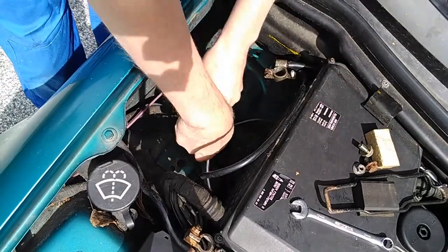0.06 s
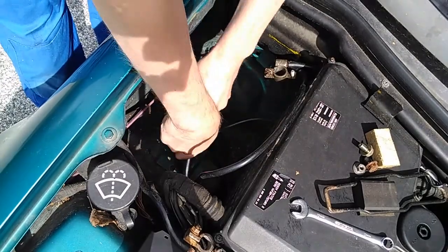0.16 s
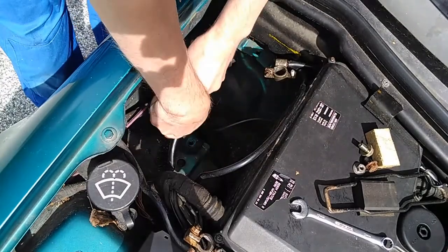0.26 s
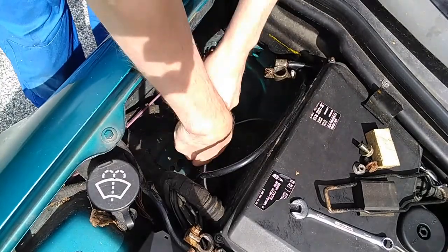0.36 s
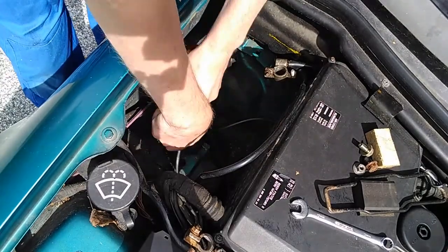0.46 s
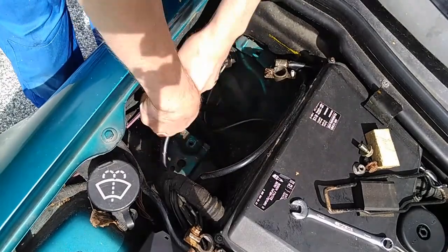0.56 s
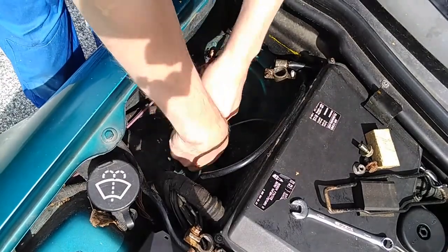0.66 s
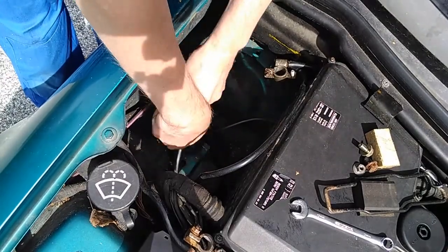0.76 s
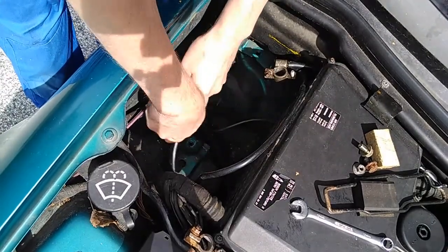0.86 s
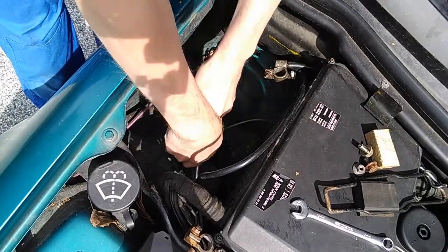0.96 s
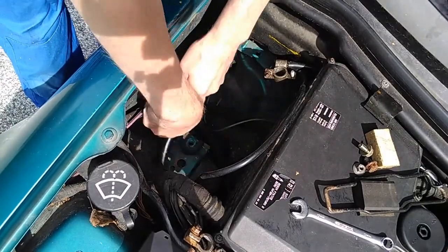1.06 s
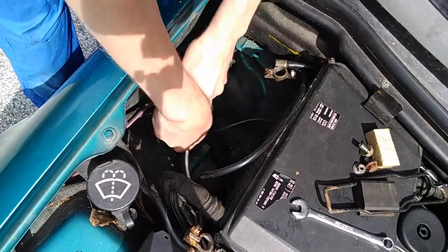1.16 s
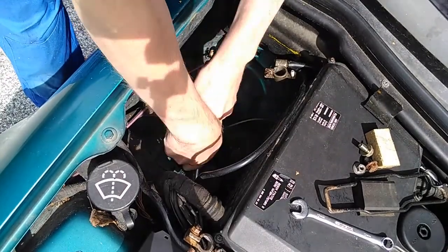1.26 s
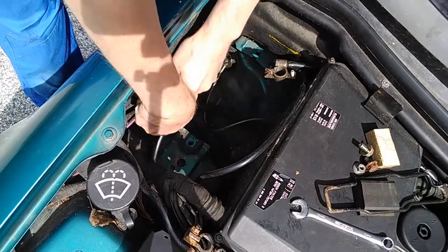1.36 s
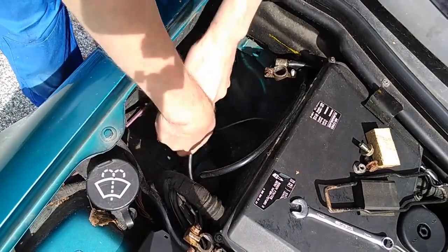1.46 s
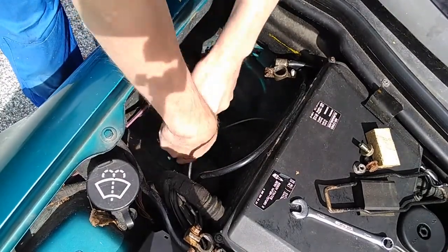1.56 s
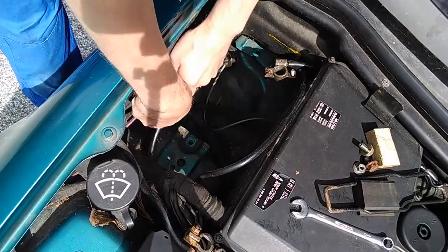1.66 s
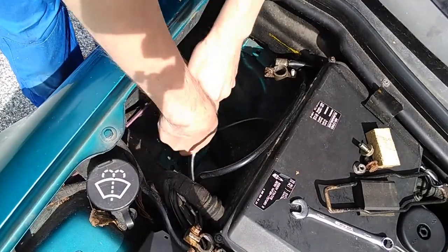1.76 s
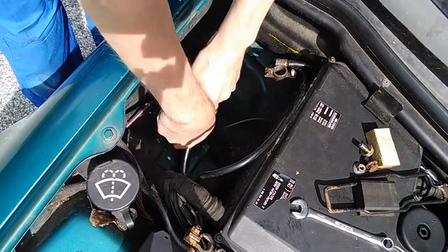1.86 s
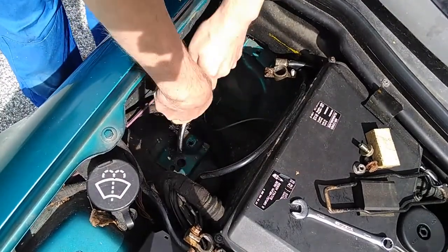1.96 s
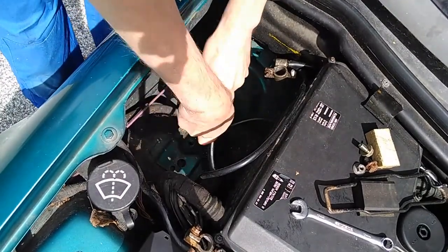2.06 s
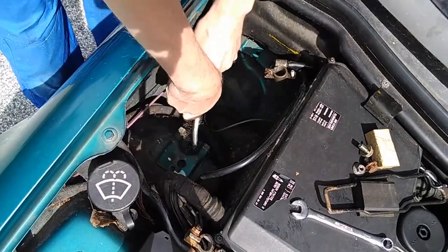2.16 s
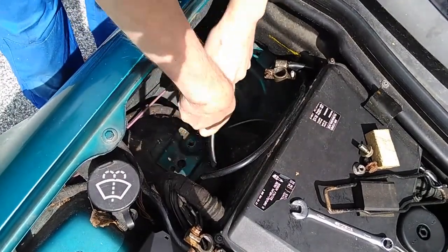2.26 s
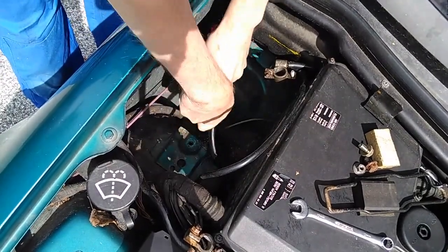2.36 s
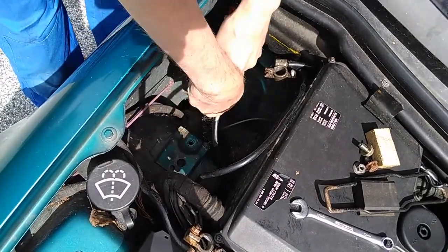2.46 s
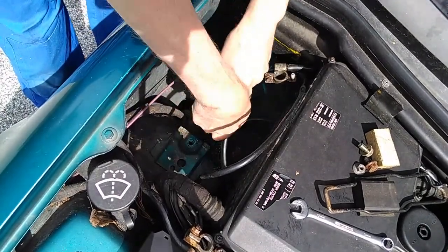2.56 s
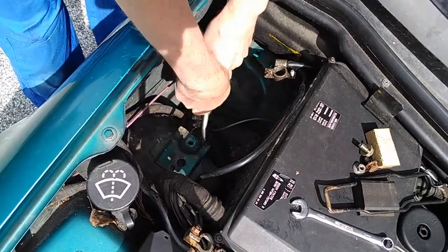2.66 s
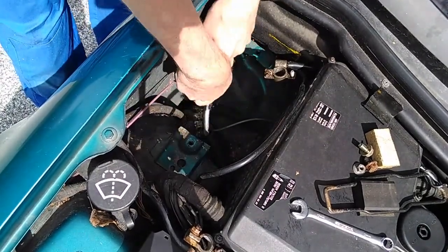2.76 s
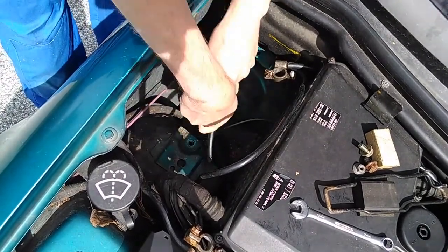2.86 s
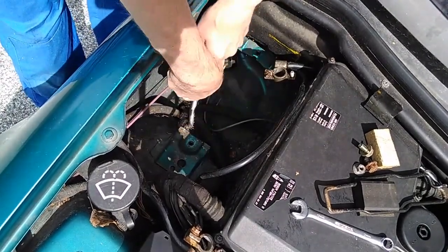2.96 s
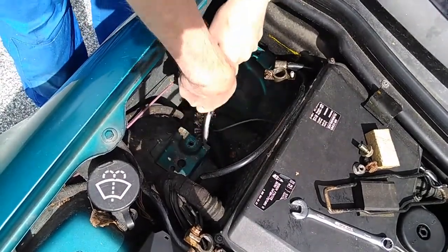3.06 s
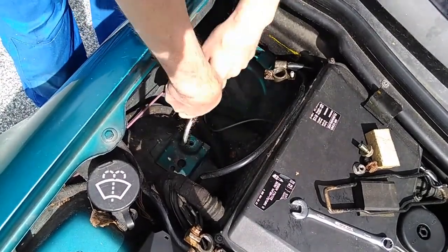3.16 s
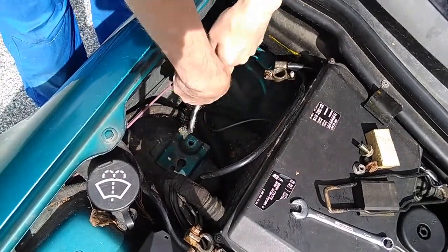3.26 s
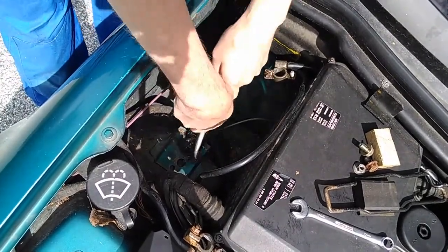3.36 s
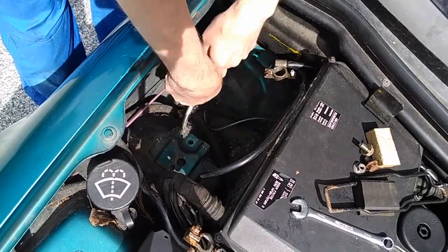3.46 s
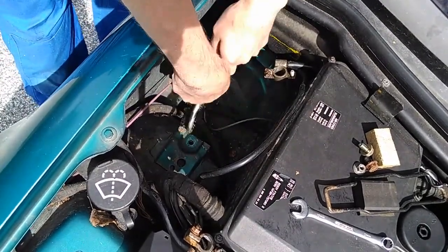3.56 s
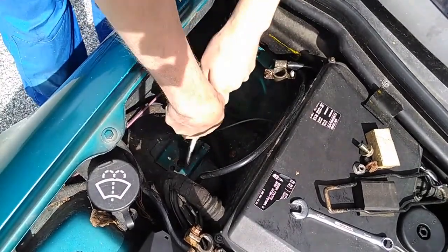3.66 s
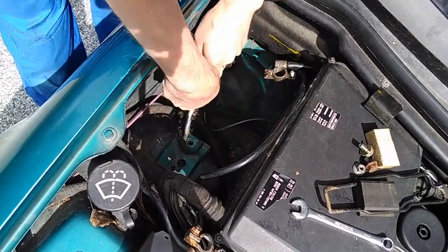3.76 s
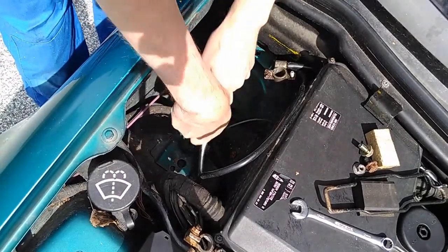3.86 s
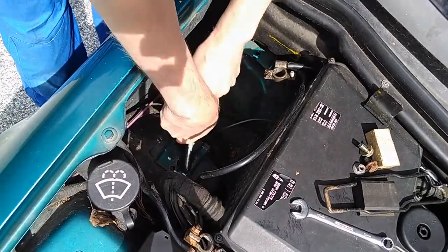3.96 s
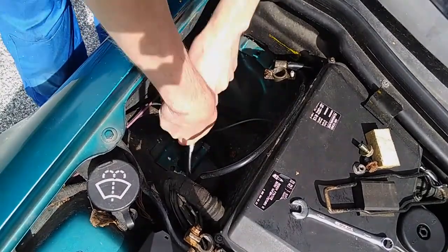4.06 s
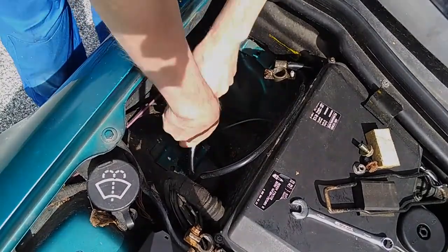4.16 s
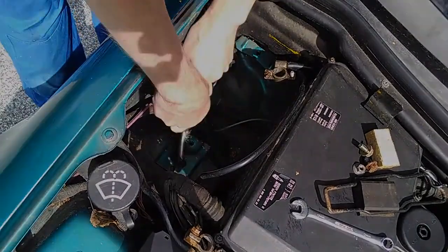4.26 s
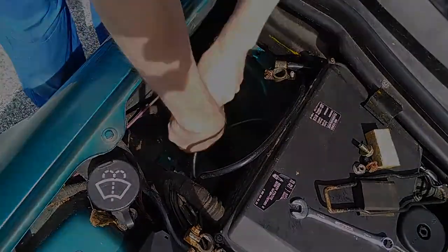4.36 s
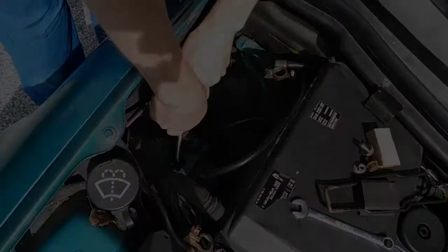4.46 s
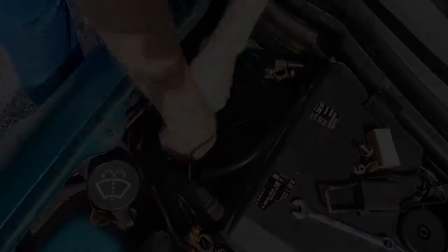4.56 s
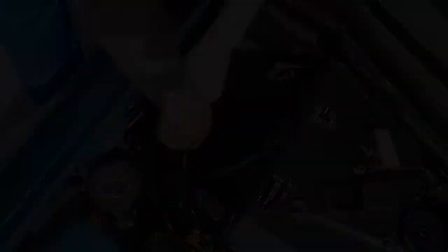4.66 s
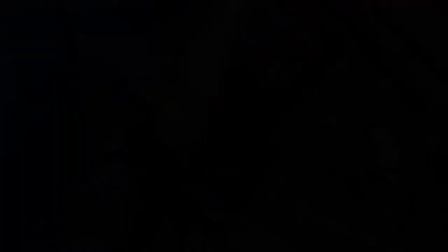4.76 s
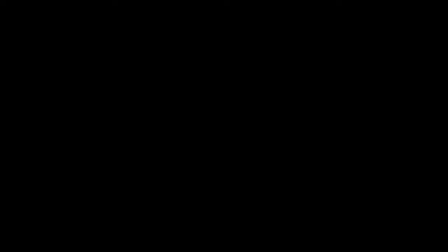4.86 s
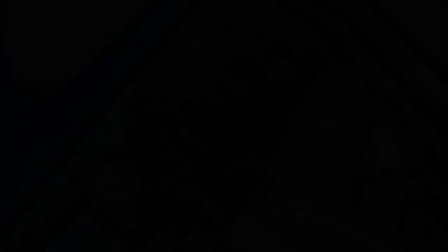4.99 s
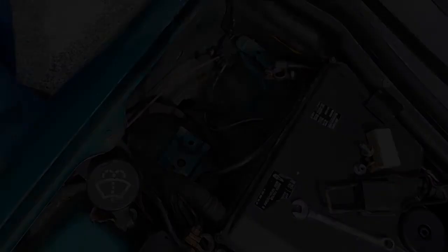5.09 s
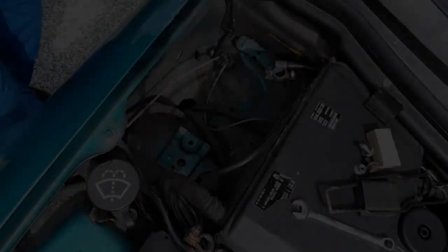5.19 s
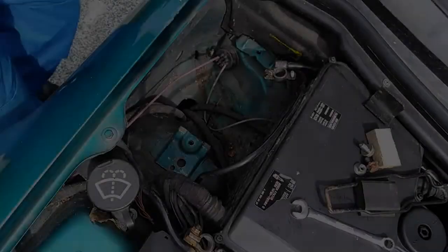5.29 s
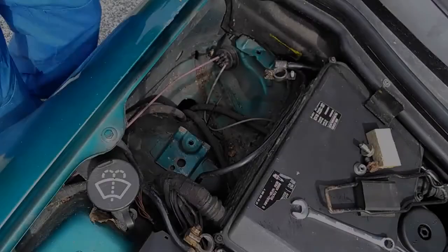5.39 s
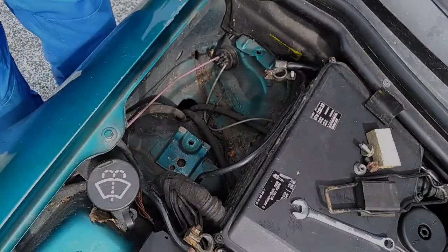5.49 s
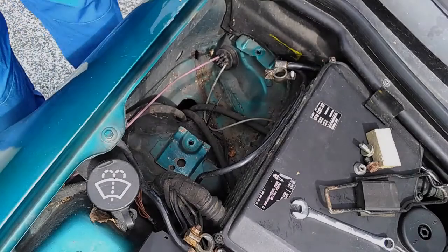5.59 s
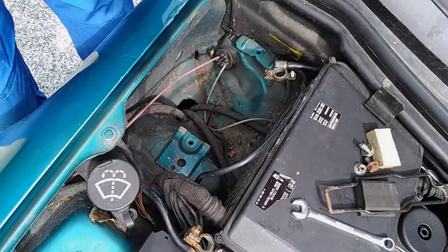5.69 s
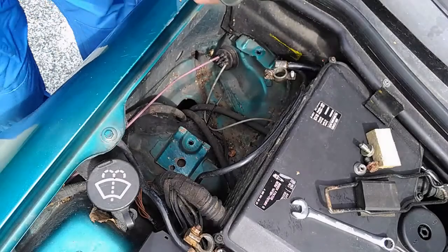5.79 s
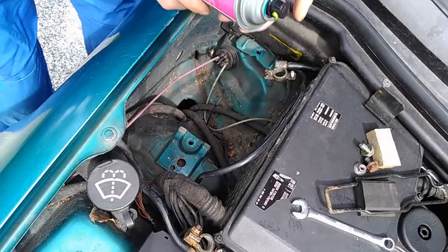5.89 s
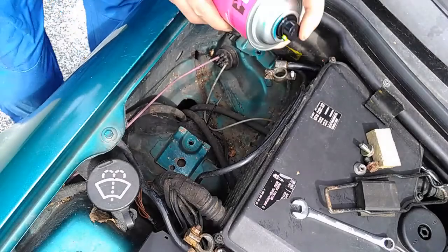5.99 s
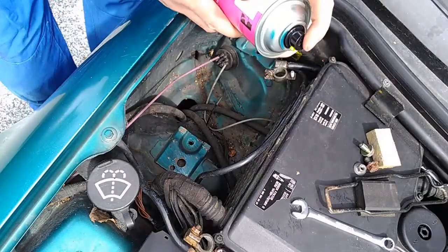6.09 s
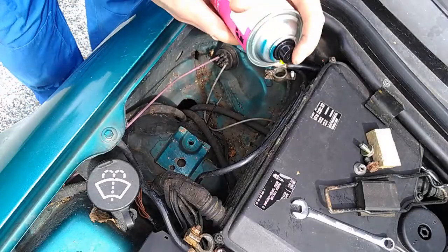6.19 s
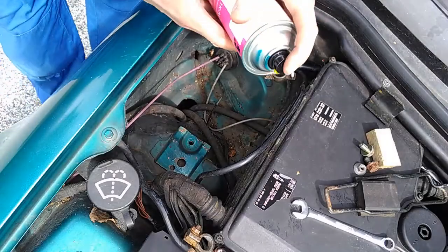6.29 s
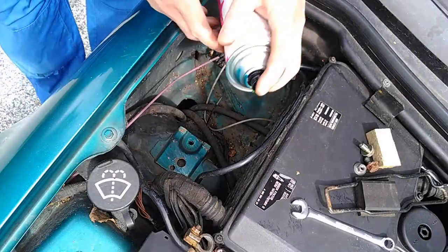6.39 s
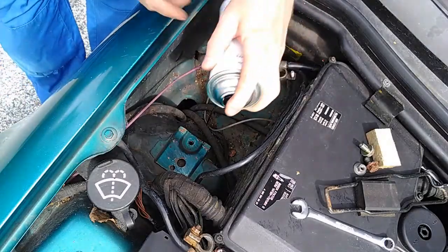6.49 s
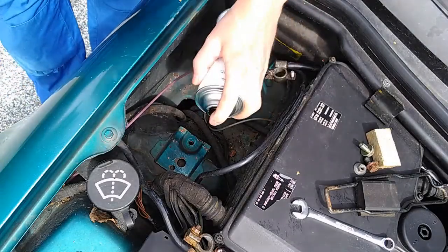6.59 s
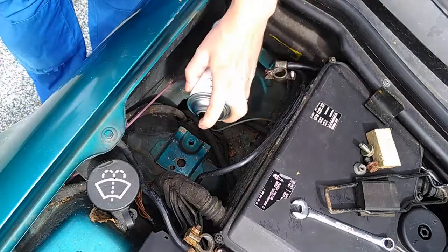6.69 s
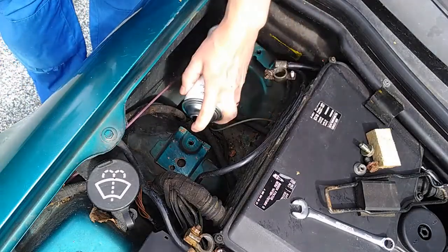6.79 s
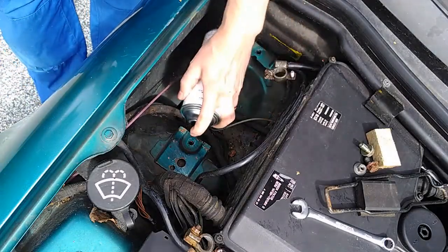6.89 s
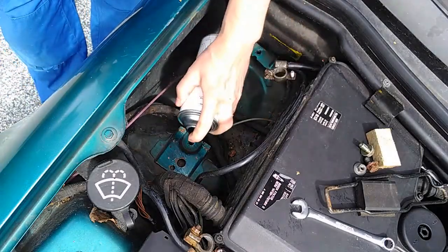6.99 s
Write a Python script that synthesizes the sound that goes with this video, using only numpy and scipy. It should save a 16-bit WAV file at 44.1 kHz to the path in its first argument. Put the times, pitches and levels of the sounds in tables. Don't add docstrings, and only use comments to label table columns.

```python
import sys
import numpy as np
from scipy import signal
from scipy.fft import rfft, irfft, next_fast_len
from scipy.io import wavfile
from scipy.ndimage import uniform_filter1d, minimum_filter1d, map_coordinates

SR = 44100
rng = np.random.default_rng(int(sys.argv[2]) if len(sys.argv) > 2 else 0)


def put_to_file(sound):
    columns = np.atleast_2d(sound).T
    safe = np.clip(columns, -1, 1)
    whole_steps = np.round(safe * 32767)
    wavfile.write(sys.argv[1], SR, whole_steps.astype(np.int16))


def how_loud(loudness_db):
    steps = np.asarray(loudness_db, float) / 20
    return 10 ** steps


N = 310464

# (wires land [s], full speed [s], hand eases [s], nearly off [s], scratch [dB])
STROKES = [(-.06, -.02, 0.0, .06, -39), (.176, .262, .305, .345, -29.5), (.456, .515, .585, .635, -29),
           (.747, .795, .86, .93, -29.5), (1.012, 1.1, 1.15, 1.2, -28.5),
           (1.312, 1.385, 1.41, 1.495, -28.5), (1.589, 1.68, 1.715, 1.77, -28),
           (1.888, 1.945, 1.965, 2.03, -32), (2.137, 2.2, 2.235, 2.3, -33),
           (2.383, 2.415, 2.455, 2.55, -30), (2.661, 2.725, 2.782, 2.805, -30.5),
           (2.938, 3.0, 3.046, 3.062, -29.5), (3.205, 3.222, 3.305, 3.365, -33.5),
           (3.46, 3.468, 3.566, 3.582, -32), (3.728, 3.748, 3.81, 3.87, -34),
           (3.976, 4.072, 4.085, 4.11, -27.5)]
# (turn [s], fastest [s], scratch [dB])
SCRUB = [
    (4.118, 4.155, -35.5),
    (4.24, 4.312, -30),
    (4.35, 4.405, -34),
    (4.475, 4.545, -36.5),
    (4.575, 4.652, -29.5),
    (4.695, 4.8, -32),
    (4.825, 4.872, -26.5),
]
# (frequency [Hz], density [dB per Hz])
WIRE_COLOUR = [(260, -39), (450, -9), (720, -2), (1120, -8.5), (1390, -9), (1660, -6.5), (2010, -4.5),
               (3610, -10), (5610, -3), (10200, -17), (13100, -13), (14400, -13), (15000, -86)]
# (frequency [Hz], width [Hz], level [dB])
TRAY_MODES = [(1450, 136, -0.5), (1980, 19, 8), (2200, 44, -3.5), (5800, 30, -5), (6500, 150, -22),
              (14000, 300, -0.5)]
# (frequency [Hz], width [Hz], level [dB])
PANEL_MODES = [(197, 50, -0.5), (319, 50, 0), (406, 19.2, -1)]
# (time [s], place [0 rim - 1 edge])
BRUSH_PLACE = [
    (0, .8),
    (2, .5),
    (2.15, .15),
    (3.4, 0),
    (3.48, .7),
    (3.6, .1),
    (4.1, .95),
    (4.54, .95),
    (4.64, .45),
]
# (time [s], level [dB])
BRUSH_LOWS = [
    (4.82, 1.5),
    (4.86, -5.5),
]
# (time [s], peak [dB], pitch [Hz], hard knock relative [dB])
THUDS = [(0.004, -21, 198, -22), (0.175, -21, 188, -11), (0.457, -19.5, 170, -8),
         (0.749, -12.5, 196, -16.5), (1.011, -19.5, 201, -8.5), (1.315, -16, 189, -9),
         (1.589, -26, 168, -4.5), (1.912, -23, 211, -18), (2.136, -27.5, 317, -14),
         (2.209, -18.5, 205, 9.5), (2.386, -37, 185, 7), (2.612, -29, 191, -9), (2.661, -22, 184, -5.5),
         (2.939, -17, 186, -21), (3.222, -21, 190, -18), (3.468, -24, 410, -13), (3.75, -20.5, 201, -19),
         (3.974, -29.5, 205, -6), (4.07, -17.5, 208, 7.5), (4.797, -15, 215, 9.5)]
# (frequency [Hz], width [Hz], level [dB])
KNOCK_MODES = [(450, 260, -4), (730, 200, -3), (1065, 130, -1), (1264, 120, -10), (1580, 310, -7),
               (2100, 900, -11)]
# (time [s], peak [dB])
SNAPS = [
    (0.9293, -30),
    (1.0395, -35),
    (1.1938, -14),
    (2.3126, -46),
    (2.816, -15),
    (3.6411, -19.5),
    (4.3494, -25),
    (4.4902, -13),
    (4.5044, -20),
    (4.5894, -18),
]
# (time [s], peak [dB], ring [Hz], treble relative [dB])
CLATTER = [(4.9514, -8, 4530, 2), (4.9808, -8.5, 3920, 4), (4.9857, -11, 4650, 8), (4.9938, -7, 4400, -1),
           (4.9984, -15.5, 4750, 15), (5.0292, -15.5, 4630, 4.5), (5.0517, -16, 4440, -19),
           (5.0643, -5.5, 4700, -3.5), (5.091, -1.5, 4830, -6), (5.0977, -20, 2480, 8),
           (5.1258, -18.5, 2600, -8), (5.1512, -17, 2430, -10), (5.17, -18, 2140, -13),
           (5.1947, -16, 3520, -13), (5.221, -6.5, 4500, 7.5), (5.2305, -0.5, 2490, -10),
           (5.2384, -9, 4740, -1), (5.2511, -5.5, 1900, 0), (5.266, -13, 1880, -12),
           (5.2745, -16, 2710, -8), (5.289, -18, 1840, -9), (5.3404, -6, 4600, 0), (5.3661, -3, 4730, -5),
           (5.3705, -2.5, 4770, -3), (5.3968, -13.5, 2150, -9), (5.43, -5.5, 2010, -14),
           (5.4532, -13.5, 1980, -12), (5.4793, -19.5, 2690, -12), (5.5068, -13, 3680, 7),
           (5.541, -21, 4600, 8)]
# (time [s], peak [dB], ring [Hz], treble relative [dB])
SETTLING = [(5.5545, -28, 2420, -4), (5.6444, -33, 2510, -10), (5.661, -24, 2350, -2.5),
            (5.688, -21.5, 2650, -4), (5.6922, -16, 2140, -14), (5.7433, -22, 2620, 3.5),
            (5.7495, -19, 3530, -4), (5.7678, -13.5, 5000, -6), (5.7887, -25, 4470, 0),
            (5.8037, -25.5, 3630, -9), (5.8417, -22.5, 4550, -3), (5.8776, -26.5, 4530, 0),
            (5.9009, -29, 4500, -11), (5.9144, -20, 1830, -6), (5.9477, -22, 1910, -9.5),
            (6.004, -30, 4760, -4), (6.029, -26.5, 1500, -7), (6.0673, -29.5, 4220, -1),
            (6.1043, -37, 2410, -13), (6.2124, -38.5, 2800, 2.5), (6.6584, -35, 4750, -3),
            (6.7245, -43, 4540, -1)]
SHELL_HZ = [1900, 2450, 3500, 4450, 4900]
# (time [s], level [dB])
RUSTLE = [
    (4.92, -36),
    (4.996, -22),
    (5.118, -28),
    (5.33, -25),
    (5.34, -38),
    (5.73, -55),
    (5.745, -38.5),
    (6.1, -44),
    (6.16, -60),
]
# (frequency [Hz], density [dB per Hz])
CAN_COLOUR = [(300, -30), (700, -9), (1350, -7.5), (1800, 2.5), (3800, 1), (4730, 6.5), (6450, -1.5),
              (9500, -15), (13600, -14), (14400, -10), (16500, -22)]
# (time [s], level [dB])
TRAFFIC_SWELL = [
    (0, 0),
    (1.2, -2),
    (2.5, 1),
    (4, -1),
    (5.1, 2),
    (5.85, 2),
    (7.04, 1),
]
# (frequency [Hz], density [dB per Hz])
RUMBLE_COLOUR = [(13, -66), (30, -48), (48, -12), (65, 4), (156, -2.5), (220, -28.5), (290, -51),
                 (480, -120)]
TRAFFIC_COLOUR = [(76, -1), (130, -8), (157, -10), (222, -8.5), (560, -6.5), (900, -7.5), (1450, -20),
                  (2080, -60), (3520, -120)]
HISS_COLOUR = [(650, -2), (1100, -11.5), (1950, -7), (2230, -7), (2540, -12), (4610, -7.5), (10500, -22),
               (13700, -28), (15300, -55)]
# (frequency [Hz], left over right [dB])
PORT_BALANCE = [(200, -.5), (1200, -2.5), (2700, -4.5), (4200, -10.5), (5600, -23.5), (7000, -14.5),
                (8500, -2.5), (10000, 2.5), (11500, -14), (13000, -16.5), (14500, -16)]
# (frequency [Hz], likeness [0-1])
NEAR_ALIKE = [(100, 0.99), (400, 0.95), (1000, 0.78), (2500, 0.35), (6000, 0.1), (14000, 0.1)]
FAR_ALIKE = [(60, 1), (300, 0.85), (800, 0.91), (2000, 0.084)]

TREBLE_LATE_S = .00663


def brush():
    scratch, song = pressure()
    grip = how_loud(1.5 * wobble(45) + 1.8 * wobble(160))
    rust = filtered(flicks(8000, spread_db=2.0), colour(WIRE_COLOUR))

    rings = 0
    for part in np.array_split(TRAY_MODES, 3):
        wander = how_loud(2.3 * wobble(9))
        rings = rings + wander * filtered(rust, modes(part))
    place = curves(BRUSH_PLACE)
    edge_gain = how_loud(13 - 36 * place)
    rim_gain = how_loud(-10 + 13 * place)
    edge = edge_gain * filtered(rust, modes([(2945, 83, -1)]))
    edge = edge + rim_gain * filtered(rust, modes([(4810, 326, 0)]))
    wires = unit(patchy(0.84 * rust + 1.31 * rings + edge, patchy_db=3.2))

    body = filtered(wires, lambda hz: 1 / (1 + (hz / 1300) ** 6))
    fizz = filtered(wires, lambda hz: 1 / (1 + (hz / 5200) ** -6.0))
    lows = how_loud(curves(BRUSH_LOWS))
    wires = wires + (lows - 1) * body
    speed = np.abs(uniform_filter1d(scratch, size=800, origin=300))
    brightness = np.minimum(speed / how_loud(-26), 1.5) ** 0.26
    wires = wires + (brightness - 1) * fizz

    song_mode = modes([(5590, 230, 0), (5250, 260, -7)])
    whistle = filtered(song * grip * flicks(5000, spread_db=2.9), lambda hz: song_mode(hz) ** 2)
    boom = how_loud(-11.5) * scratch ** 0.77 * how_loud(2.13 * wobble(30))
    panel_mode = modes(PANEL_MODES)
    panel = filtered(boom * flicks(1500, spread_db=1.0), lambda hz: panel_mode(hz) * highpass(hz, 118))
    return how_loud(6.2) * scratch * grip * wires + how_loud(23.2) * whistle + how_loud(23) * lows * panel


def pressure():
    shapes = []
    for land, full, ease, off, db in STROKES:
        bent_back = land + .3 * (full - land)
        shapes.append([(land, db - 11), (bent_back, db - 12), (full, db), (ease, db),
                       (off, db - 19), (off + .04, db - 42)])
    scrubbing = []
    for turn, fast, db in SCRUB:
        scrubbing += [(turn, -44), (fast, db)]
    shapes.append(scrubbing + [(4.942, -33)])

    push = 0
    for rows in shapes:
        push = push + curves([(s, how_loud(db / 2)) for s, db in rows], 0)[0]
    scratch = np.abs(uniform_filter1d(push ** 2, size=70))
    singing = np.minimum(scratch / how_loud(-30), 1) ** .4
    return scratch, scratch * singing * how_loud(-2.5 + 3 * wobble(25))


def flicks(per_second, spread_db):
    hit = rng.random((2, N)) < per_second / SR
    sign_and_size = rng.standard_normal((2, N))
    stronger = np.minimum(rng.exponential(size=(2, N)), 3)
    return unit(hit * sign_and_size * how_loud(spread_db * stronger))


def thuds():
    low, hard = np.zeros((2, 2, N + SR))
    t = np.arange(SR // 6) / SR
    for s, db, hz, knock_db in THUDS:
        at = round(s * SR)
        ring = np.sin(2 * np.pi * hz * t)
        ring = ring + 0.51 * np.sin(2 * np.pi * 1.55 * hz * t + rng.uniform(0, 6.45))
        low[0, at:at + len(t)] += how_loud(db + 3.5 - 60 * t / 0.07) * (1 - np.exp(-t / 0.0026)) * ring
        knock = how_loud(db + knock_db + 18.5 - 60 * t / 0.053) * (1 - np.exp(-t / 0.0007))
        hard[:, at:at + len(t)] += knock * rng.standard_normal((2, len(t)))
    return filtered(low[:, :N], lambda hz: highpass(hz, 90)) + filtered(hard[:, :N], modes(KNOCK_MODES))


def snaps():
    out = np.zeros((2, N))
    t = np.arange(SR // 40) / SR
    for s, db in SNAPS:
        at = round((s - TREBLE_LATE_S) * SR)
        out[:, at:at + len(t)] += how_loud(db - 10 - 60 * t / 0.016) * rng.standard_normal((2, len(t)))
    return filtered(out, modes([(5800, 990, 6.5), (9500, 5000, -10)]))


def can():
    shell, crack, treble = np.zeros((3, 2, N + SR))
    t = np.arange(SR // 20) / SR
    rise = 1 - np.exp(-t / 0.00019)
    snap = (1 - np.exp(-t / .0007)) * how_loud(1 - 60 * t / .012)
    for s, db, hz, treble_db in blows():
        at = round(s * SR)
        hit = slice(at, at + len(t))
        low_hz = hz * (1 + 0.036 * rng.standard_normal((2, 1)))
        high_hz = rng.uniform(5570, 6730, (2, 1))
        low_decay = how_loud(db - 5.0 + 8 * hz / 4500 - 60 * t / (0.012 + 14 / hz))
        low = low_decay * np.sin(2 * np.pi * low_hz * t)
        high = how_loud(db + treble_db - 2.5 - 60 * t / 0.017) * np.sin(2 * np.pi * high_hz * t)
        shell[:, hit] += rise * (low + high)
        crack[:, hit] += how_loud(db + 4.5) * snap * rng.standard_normal((2, len(t)))
        treble[:, hit] += how_loud(db + treble_db + 13.5) * snap * rng.standard_normal((2, len(t)))

    effort = how_loud(curves(RUSTLE, -150)) * how_loud(3.2 * wobble(90) - 1.5)
    loose_parts = filtered(flicks(1600, spread_db=2.5), colour(CAN_COLOUR))
    rustle = effort * unit(patchy(loose_parts, patchy_db=1.5))
    tint = colour(CAN_COLOUR)
    dull = filtered(crack[:, :N], lambda hz: tint(hz) / (1 + (hz / 5000) ** 8))
    bright = filtered(treble[:, :N], lambda hz: tint(hz) / (1 + (5000 / (hz + 1)) ** 8))
    return shell[:, :N] + dull + bright + rustle


def blows():
    rows = np.array([*CLATTER, *SETTLING])
    wait, part = rng.random((len(rows), 2)).T
    hz = np.array(SHELL_HZ)[(part * len(SHELL_HZ)).astype(int)]
    later = rows[:, 0] + .009 * (.5 + wait)
    rebounds = np.transpose([later, rows[:, 1] - 12, hz, np.full(len(rows), -9.0)])
    return [*rows, *rebounds]


def street():
    near_db, = curves(TRAFFIC_SWELL)
    hiss_db = -52 + 3 * (np.arange(N) / SR > 6.15)
    a, b = noise(RUMBLE_COLOUR) * how_loud(-52 + near_db + 3.6 * wobble(7.2))
    rumble = np.array([1.3 * a + 0.9 * b, 0.6 * a - 0.5 * b]) * how_loud([[-7], [7]])
    traffic = noise(TRAFFIC_COLOUR) * how_loud(-47.5 + near_db + 1.8 * wobble(4.066))
    hiss = noise(HISS_COLOUR) * how_loud(hiss_db + 1.5 * wobble(6))
    return rumble + ports(traffic + hiss, FAR_ALIKE, lag_s=-0.00024)


def noise(spectrum):
    return unit(filtered(rng.standard_normal((2, N)), colour(spectrum)))


def bay(x, t60, wet_db):
    t = np.arange(SR // 5) / SR
    tail = rng.standard_normal((2, len(t))) * how_loud(-60 * t / t60)
    wet = signal.fftconvolve(x, tail / np.linalg.norm(tail[0]), axes=1)[:, :N]
    return x + how_loud(wet_db) * wet


def ports(pair, alike, lag_s):
    m = next_fast_len(N + SR // 4)
    hz = np.fft.rfftfreq(m, 1 / SR)
    turn = np.arccos(np.clip(along(alike, hz), 0, 1)) / 2
    mid, side = rfft(pair, m) * [np.cos(turn), np.sin(turn)]
    share = 1 / (1 + how_loud(-2 * along(PORT_BALANCE, hz)))
    left = (mid + side) * np.sqrt(2 * share) * np.exp(-2j * np.pi * hz * lag_s)
    right = (mid - side) * np.sqrt(2 - 2 * share)
    return irfft([left, right], m)[:, :N]


def patchy(x, patchy_db):
    z = signal.stft(x, nperseg=256)[2]
    field = uniform_filter1d(rng.standard_normal(z.shape[1:]), size=3, axis=0)
    field = uniform_filter1d(field, size=10, axis=1)
    return signal.istft(z * how_loud(patchy_db * unit(field)), nperseg=256)[1][:, :N]


def modes(table):
    def response(f):
        total = 0
        for k, (centre, width, db) in enumerate(table):
            damping = 1j * f * width
            total = total + (-1) ** k * how_loud(db) * damping / (centre * centre - f * f + damping)
        return total
    return response


def colour(spectrum):
    return lambda hz: how_loud(along(spectrum, hz))


def highpass(hz, corner_hz):
    u = 1j * hz / corner_hz
    return u * u / (1 + np.sqrt(2) * u + u * u)


def filtered(x, response):
    m = next_fast_len(N + SR // 2)
    return irfft(rfft(x, m) * response(np.fft.rfftfreq(m, 1 / SR)), m)[..., :N]


def along(points, hz):
    f, v = np.transpose(points)
    return np.interp(np.log(hz + 1), np.log(f + 1), v)


def curves(rows, outside=None):
    s, *cols = np.transpose(rows)
    return np.array([np.interp(np.arange(N) / SR, s, c, outside, outside) for c in cols])


def wobble(rate):
    at = np.arange(0, N + 32, 32)
    knots = rng.standard_normal(int(N * rate / SR) + 4)
    return np.interp(np.arange(N), at, map_coordinates(knots, [at * rate / SR]))


def unit(x):
    return x / np.sqrt(np.mean(x ** 2) + 1e-20)


def scene():
    tray = ports(bay(brush() + thuds() + snaps(), t60=0.14, wet_db=-14.5), NEAR_ALIKE, lag_s=0.00017)
    rattle = ports(bay(can(), t60=.06, wet_db=-12), NEAR_ALIKE, lag_s=0.00035)
    return tray + rattle + street()


def top_cut(x):
    return signal.sosfilt(signal.butter(12, 15460, fs=SR, output="sos"), x)


def record(dry):
    def response(hz):
        treble = 1 / (1 + (5050 / (hz + 1)) ** 24)
        late = np.exp(-2j * np.pi * hz * TREBLE_LATE_S)
        top = .018 + .982 / (1 + (hz / 14220) ** 130)
        return highpass(hz, 52) * top * (1 - treble + treble * late)

    split = filtered(dry, response)
    need = np.minimum(1, .97 / (np.abs(split).max(axis=0) + 1e-9))
    limiter = uniform_filter1d(minimum_filter1d(need, size=81), size=41)
    return top_cut(split * limiter)


dry = scene()
out = record(dry)
put_to_file(out)
```